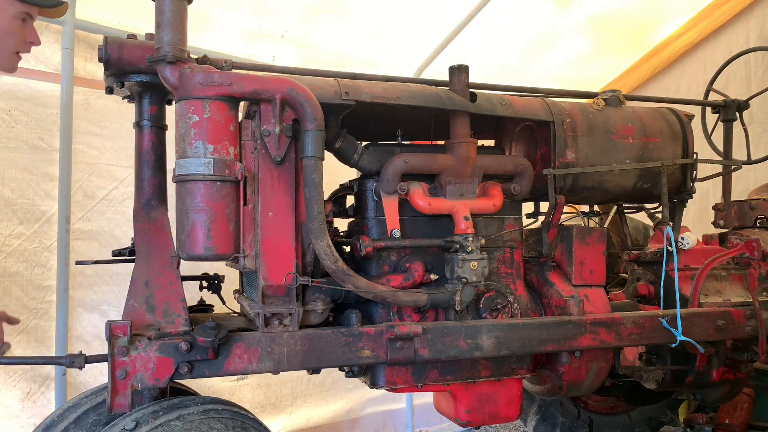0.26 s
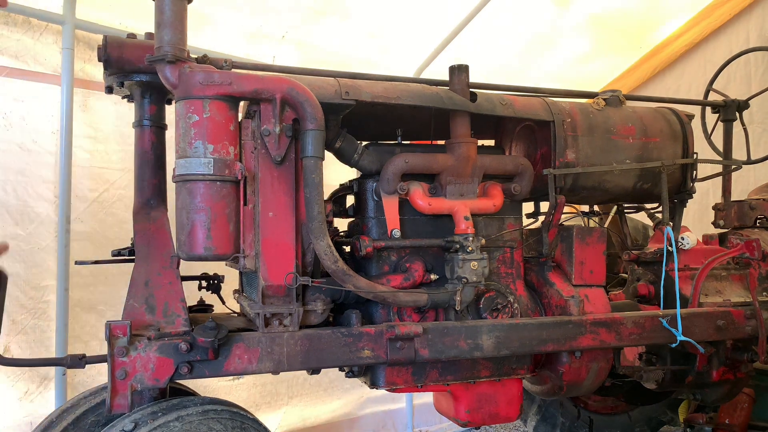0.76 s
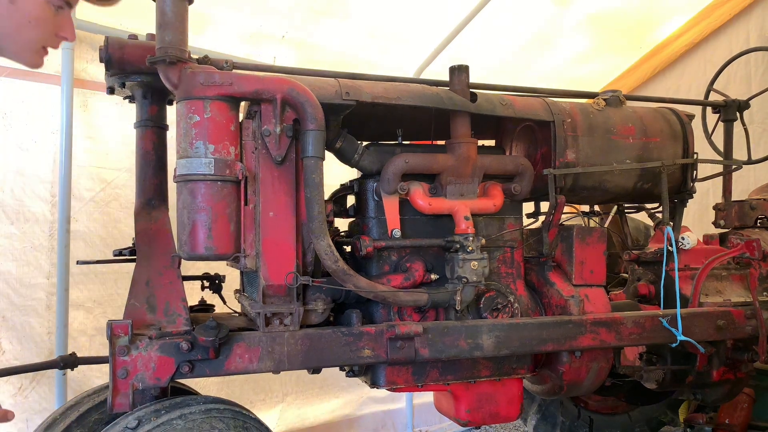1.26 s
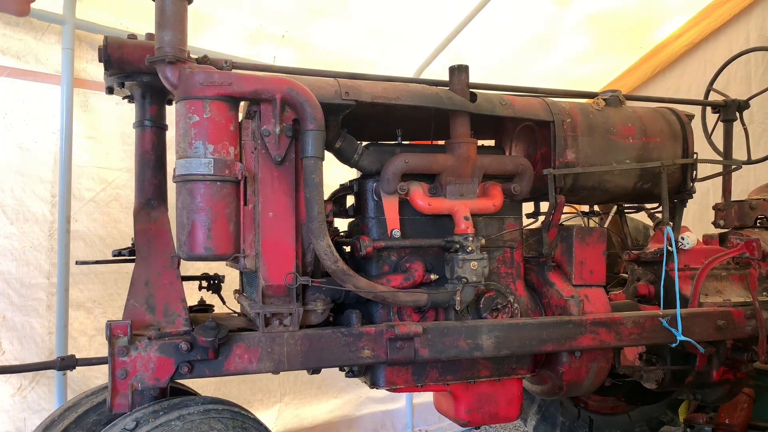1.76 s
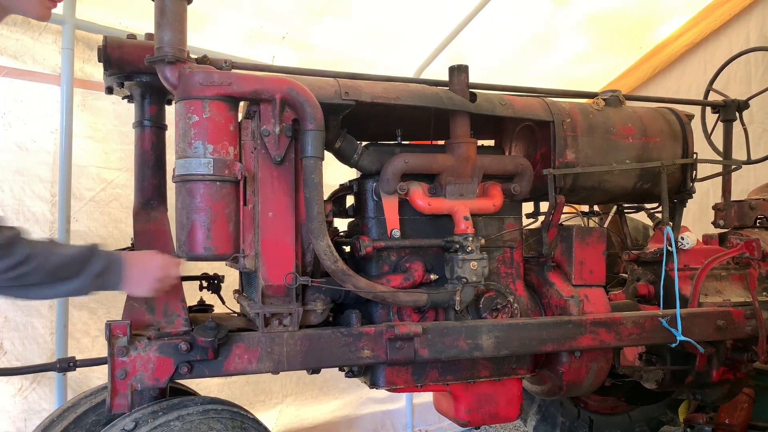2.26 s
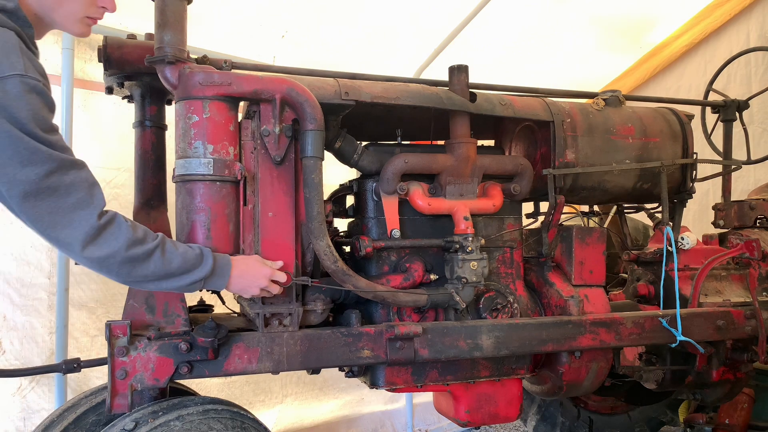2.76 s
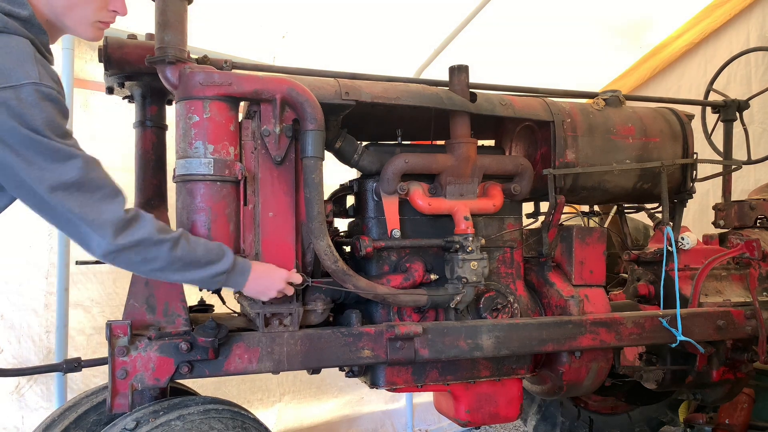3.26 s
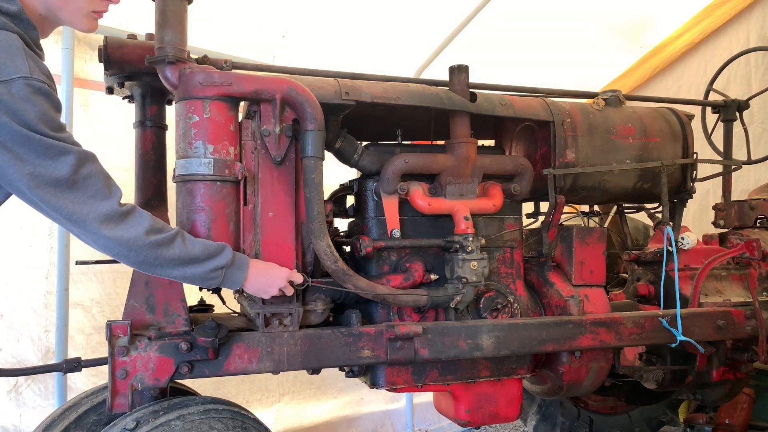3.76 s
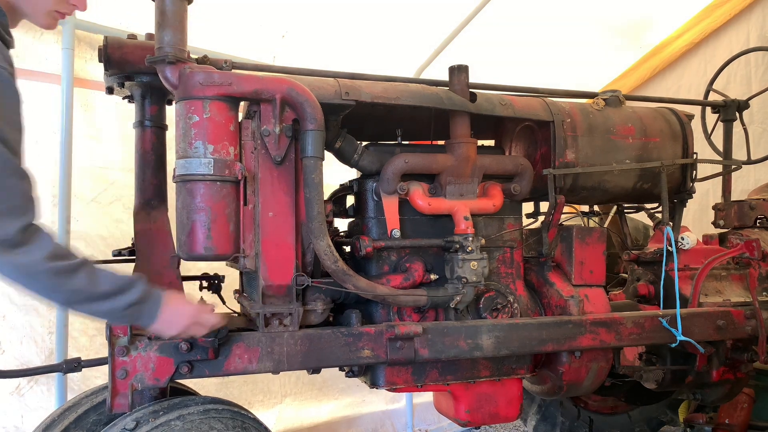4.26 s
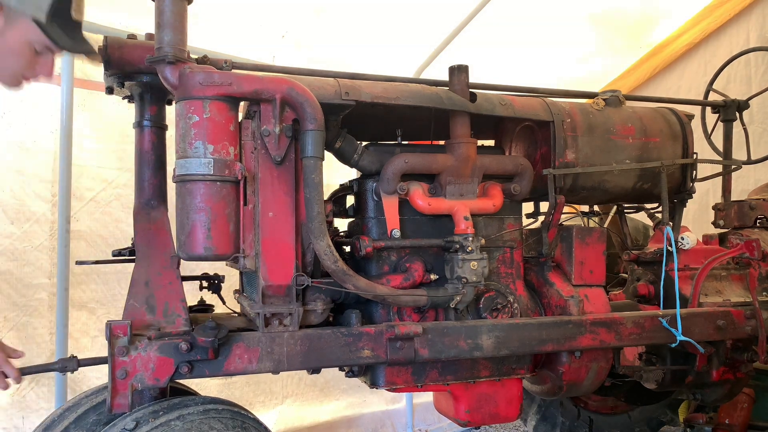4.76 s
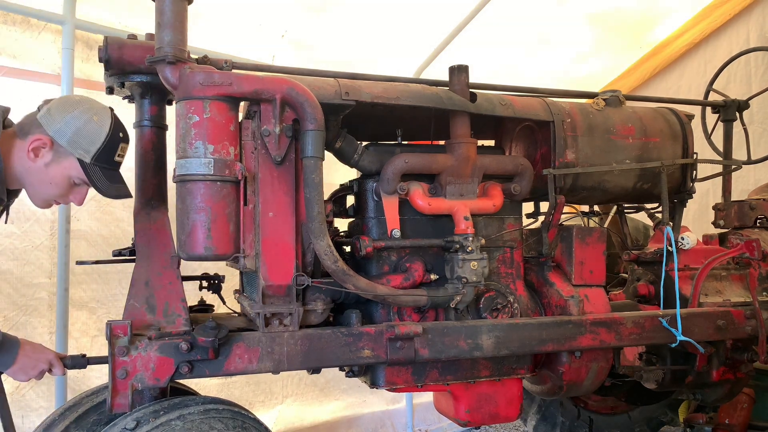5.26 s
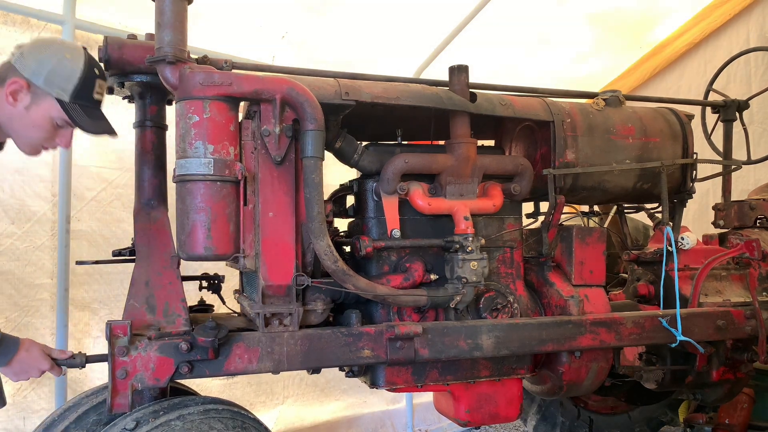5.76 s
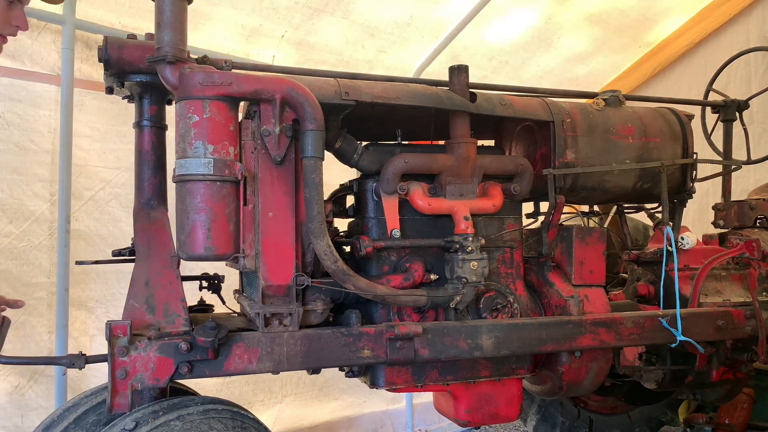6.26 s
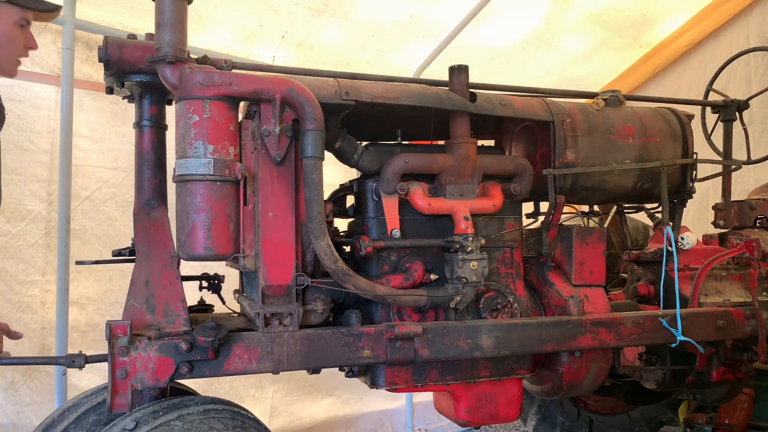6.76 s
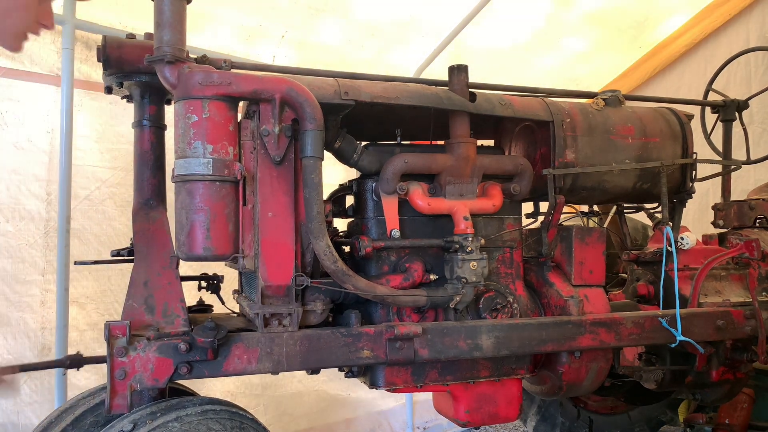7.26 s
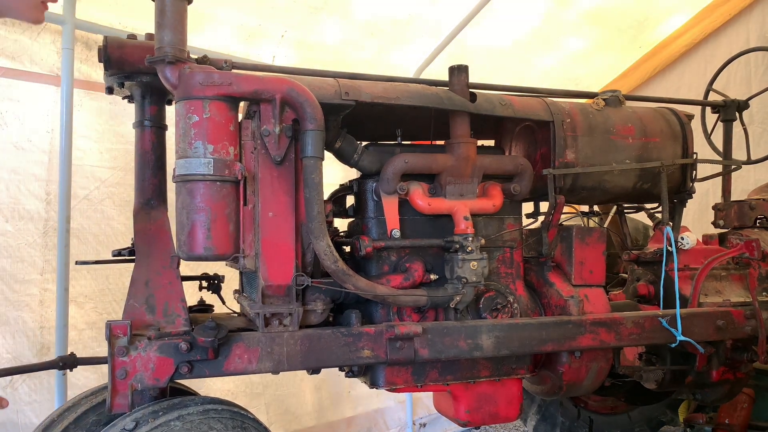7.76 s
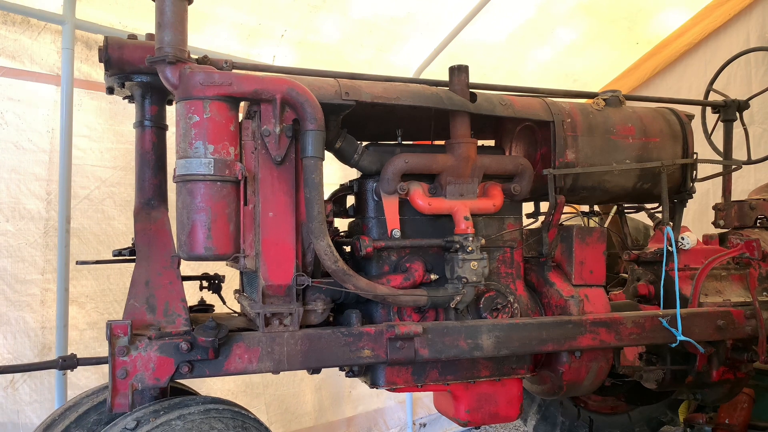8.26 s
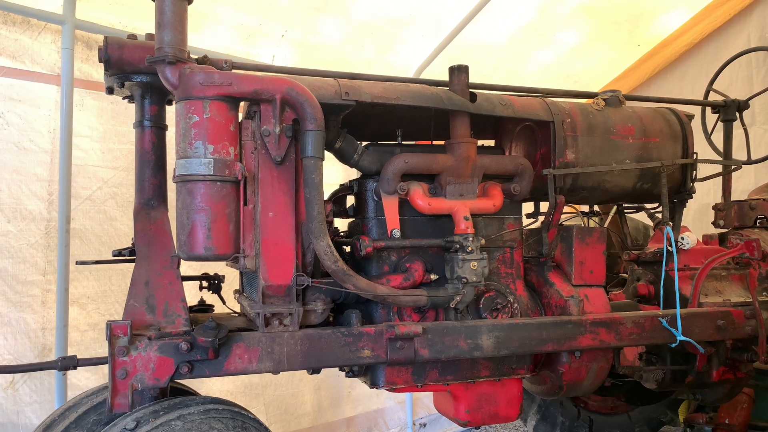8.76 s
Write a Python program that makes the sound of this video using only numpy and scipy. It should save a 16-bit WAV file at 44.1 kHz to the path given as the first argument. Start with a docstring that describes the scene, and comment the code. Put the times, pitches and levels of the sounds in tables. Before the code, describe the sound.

An old four-cylinder engine is hand-cranked in a tent, pops sharply, coasts down chuffing to silence, then after clanks sputters again.

```python
"""In a tent, an old four-cylinder tractor is hand-cranked, heard in two microphone ports.
Scuffs, gear rumble and clanks lead to magneto snaps and a run of sharp pops: filtered noise bursts and ringing modes.
The engine coasts to rest, its pipe booming (gliding tones) at every stroke; air hisses while the choke rod is held.
Loose linkage taps and squeaks, then the crank is knocked back into its dog and a second run of pops follows."""
import sys
import numpy as np
from scipy import signal
from scipy.fft import rfft, irfft, next_fast_len
from scipy.io import wavfile
from scipy.ndimage import map_coordinates

SR = 44100
rng = np.random.default_rng(int(sys.argv[2]) if len(sys.argv) > 2 else 0)


def persist_wave(psi):
    """Save psi, clipped to +-1, as 16-bit WAV."""
    counts = np.round(np.clip(psi, -1, 1) * 32767).astype(np.int16)
    wavfile.write(sys.argv[1], SR, np.atleast_2d(counts).T)


N = 397645

# All levels are relative: each source applies its own mix gains.
# firings: (time [s], treble [dB], body [dB], thud [dB], pipe boom [dB], boom pitch [Hz],
#           next cylinder's puff [dB], iron ring [dB], yelp pitch [Hz])
POPS = [(1.0957, -6, -23.5, -28.5, -61, 67, -59.5, -26.5, 1035),
        (1.2344, -6.5, -22, -27, -39, 74.8, -19.5, -24, 1123),
        (1.5188, -5, -23, -33, -36, 77.1, -45.5, -26.5, 1048),
        (1.6046, -8, -24.5, -28, -40, 66, -38.5, -25, 1000),
        (1.6717, -8, -23, -26.5, -39.5, 65.4, -41.5, -25.5, 1079),
        (7.314, -3, -22.5, -35, -33, 72.6, -15.5, -15, 1106),
        (7.814, -5.5, -23.5, -33.5, -36.5, 76.1, -21, -18.5, 1095),
        (7.9406, -6, -22.5, -39, -36, 75.5, -19, -23, 1000),
        (8.32, -4.5, -22, -33, -37, 74.8, -18.5, -21, 1144),
        (8.4439, -7, -23.5, -44, -34.5, 73.9, -18, -22, 1014),
        (8.6792, -5, -22, -17, -36, 79.5, -18, -15.5, 1191),
        (8.7945, -7, -23, -26.5, -39.5, 82.5, -21.5, -23, 1144),
        (8.8993, -6.5, -21, -30, -35.5, 79.3, -56, -17, 1090)]
# magneto and crank snapping over: (time [s], treble [dB], body [dB], ring [dB])
SNAPS = [(0.8465, -3.5, -17, -20.5), (0.9595, -17, -25, -41), (1.220, -19, -28, -38),
         (1.4548, -9.5, -24, -31), (7.192, -8.5, -24, -24), (7.5428, -8.5, -21, -27), (7.720, -7, -22, -26),
         (8.1226, -14, -31, -32), (8.252, -11, -26, -39), (8.6256, -16, -29, -36.5)]
# stray puffs from cylinders that do not fire: (time [s], treble [dB], body [dB])
PUFFS = [(0.9844, -30.5, -22), (1.3653, -28, -34), (7.2987, -22, -28), (7.6294, -25, -27.5),
         (7.802, -23, -29), (8.305, -21, -29), (8.5624, -21.5, -31)]
# choke rod, crank handle, loose parts: (time [s], treble [dB], body [dB], thud [dB], ring [dB], ring pitch [Hz])
CLANKS = [(0.6671, -33, -35, -30.5, -30, 665), (0.983, -28, -26.5, -25.5, -31, 715),
          (2.6597, -29.5, -33, -32.5, -29.5, 1164), (2.731, -33, -41, -51.5, -46, 4010),
          (2.9042, -43, -40, -53.5, -43, 2044), (3.146, -27.5, -37.5, -41.5, -39, 2010),
          (3.162, -52, -40.5, -43.5, -30, 570), (3.179, -26.5, -43, -51, -48, 3770),
          (3.974, -39, -46, -44, -51, 2670), (4.1644, -48.5, -52, -52, -49, 753),
          (4.268, -47, -48.5, -52.5, -55, 1150), (5.0793, -53, -45, -44, -44, 660),
          (5.0956, -36, -45, -42, -47, 1540), (5.154, -32, -33.5, -25.5, -29.5, 1502),
          (5.465, -35, -34.5, -40.5, -43, 1040), (5.593, -30.5, -41, -45, -35, 3680),
          (5.6827, -72.5, -48, -48, -52, 1570), (5.724, -28, -36, -39.5, -32, 390.4),
          (6.304, -50, -57, -50.5, -50, 432), (7.012, -40, -44, -44, -34, 718),
          (7.256, -41, -33.5, -31.5, -43, 1680), (7.783, -57, -38, -34.5, -32, 414),
          (8.176, -30, -35.5, -38, -41, 960)]
# light, dead taps of slack linkage: (time [s], level [dB])
TAPS = [(3.646, -57.5), (3.703, -49.5), (3.912, -55), (4.068, -55.5), (4.3394, -49.5), (4.4552, -54),
        (6.158, -62), (6.197, -62), (6.494, -61.5)]
# shoes and sleeves brushing: (middle [s], length [s], swish [dB], scrape [dB])
SCUFFS = [(0.055, 0.039, -58, -46), (0.248, 0.25, -55.5, -55.5), (0.61, 0.13, -50, -40.5),
          (3.962, 0.07, -83.5, -43), (4.517, 0.12, -52, -55), (4.735, 0.3, -48, -49),
          (5.584, 0.54, -86, -54.5), (6.26, 0.35, -66, -61), (6.927, 0.17, -62.5, -50.5)]
# unfired charges pushed out through the pipe: (time [s], length [s], level [dB], starting pitch [Hz])
GULPS = [(0.777, 0.086, -34.5, 63.7), (1.419, 0.11, -29, 73), (1.81, 0.042, -36.5, 63.07),
         (7.109, 0.1, -46, 57.7), (7.476, 0.164, -40, 74.7), (8.091, 0.14, -43.5, 71.2)]
# the choke rod squeaks once: (middle [s], length [s], pitch [Hz], width [Hz], level [dB])
SQUEAK = (3.745, .06, 6050, 350, -60)
# first try at the crank: (time [s], gear rumble [dB], air hiss [dB])
FIRST_TRY = [(0.0, -50.5, -65), (.27, -58, -70), (0.43, -57.5, -75), (0.6, -51.5, -68.5),
             (0.78, -42.5, -49), (1.05, -37.5, -50.5), (1.31, -49, -50.5), (1.53, -44.5, -42.5),
             (1.8, -42, -51.5)]
# second try at the crank: (time [s], gear rumble [dB], air hiss [dB])
SECOND_TRY = [(6.8, -70.5, -89), (7.41, -41, -35.5), (7.61, -40.5, -52), (7.86, -47, -46),
              (8.09, -45, -45.5), (8.45, -47.5, -41), (8.85, -46.5, -47), (9.02, -54, -49.5)]
# cylinders taking turns at the pipe in the coast: (starting pitch at full speed [Hz], fall over the stroke [dB])
CYLINDERS = [(65, -1.5), (68, 5)]

# resonances of block, manifold and tinwork: (frequency [Hz], width [Hz], height [dB])
IRON = [(333, 40, 6.5), (735, 30, 2.5), (1065, 74, 3.5), (2058, 30, 3), (2425, 30, 5.5), (3130, 36, 2.5),
        (3360, 39, 4.5), (4070, 36, 7), (6660, 21, 4.5), (7470, 36, 12)]
# resonances of the magneto's sprung coupling: (frequency [Hz], width [Hz], level [dB])
MAGNETO = [(655, 30, -0.5), (1304, 20, 1.5), (1826, 28, 7), (5700, 31, -1.5), (6360, 30, 3.5)]
# partials of a struck part: (multiple of its pitch, width [Hz], level [dB])
PARTIALS = [(1, 23.9, 1.5), (1.07, 24, -7.5)]

# spectra of the noises, all: (frequency [Hz], density [dB per Hz])
SIZZLE = [(2500, -21), (4400, -9), (6500, -4.5), (8000, -1), (11300, -1), (13000, -1), (15000, -4.5),
          (15800, -5.5)]
POP_BODY = [(60, -21), (130, 4.5), (280, -7), (520, -6), (800, -2.5), (1450, -2.5), (2000, 5.5),
            (3200, 2.5), (4500, -0.5), (7000, -21.5)]
POP_THUD = [(50, -17.5), (125, 5.5), (250, -11.5), (400, -12), (900, -34.0)]
SNAP_BODY = [(60, -15.5), (130, 5), (330, 2.5), (700, 0), (1300, -1), (2200, 0), (3000, -5.5), (4400, -5),
             (7000, -16.5)]
SNAP_TICK = [(2500, -23.5), (4500, -13.5), (5500, -2.5), (6700, 0.5), (8000, -3.5), (11300, 1.5),
             (13000, 0), (15800, -2)]
PUFF_BODY = [(250, -6), (700, 1), (1400, -2.5), (2300, -1), (3200, -7), (7000, -16.5)]
CLANK_TICK = [(1800, -24.5), (2900, -7.5), (4200, -2.5), (7000, -0.5), (11000, -1), (16000, -12.5)]
CLANK_BODY = [(400, -14.5), (800, -7.5), (1500, -6), (2400, -9.5), (3400, -7.5), (7000, -28)]
CLANK_THUD = [(60, -19), (170, -4.5), (290, -4), (400, 2.5), (700, -1.5), (1200, -10.5), (3000, -42)]
RUMBLE = [(40, -19.5), (90, -8.5), (145, 0.5), (220, 1), (280, -8.5), (400, -3.5), (520, -13.5), (900, -23),
          (3000, -55.5)]
RASP = [(300, -12.5), (650, 2.5), (1100, -3), (2200, -6), (3200, -12), (4500, -13), (8000, -18.5)]
SCRAPE = [(60, -8.5), (130, 2.5), (220, 2), (380, 1.5), (800, -3.5), (1700, -17), (3000, -15), (7000, -28)]
AIR = [(20, -25.5), (70, 5), (120, -3), (220, -5), (340, -12.5), (600, -23), (1400, -25.5), (3500, -32.5),
       (6500, -35), (10000, -52.5), (16000, -52)]
PIPE_MURMUR = [(25, -34.5), (55, -4.0), (72, -3.5), (90, -7.5), (130, -21.5), (500, -79)]
CHOKE_JET = [(2500, -25.5), (4200, -6.5), (7000, -3), (10500, -4.5), (16000, 4.0)]

# reverberation of the tent: (frequency [Hz], t60 [s])
TENT_T60_S = [(150, 0.51), (500, 0.24), (1400, 0.13), (3700, 0.2), (10000, 0.18), (16000, 0.019)]
# likeness of the two ports: (frequency [Hz], correlation)
LIKENESS = [(370, 1), (600, 0.55), (1200, 0.45), (2200, 0.3), (3200, 0), (5500, 0), (7000, 1), (15400, 1),
            (16000, 0.3)]
# left minus right port: (frequency [Hz], level [dB])
BALANCE_DB = [(200, 0), (600, -0.4), (2500, 1), (4200, -1.5), (5700, -4.5), (7000, 1), (8000, 0)]
# lag of the left port: (frequency [Hz], phase [turns])
PORT_LAG_TURNS = [(0, 0), (75, 0.0347), (5900, 0.03), (7900, 0.37), (8650, 0.5), (10200, 1.04),
                  (11500, 1.01), (13100, 1.48), (13900, 1.5), (15300, 2.5)]
EDGE_HZ = 15900

# friction slows the flywheel at a steady rate
COAST_START_S, COAST_STROKES_PER_S, FRICTION_STROKES_PER_S2 = 1.871, 14.14, 6.62
# sounds of the coasting engine: (level at full speed [dB], loss at a tenth of that speed [dB])
COAST_BOOM, COAST_SPIT, COAST_CHUFF = (-27, 34), (-28, 58), (-33.5, 31)
COAST_RUMBLE, COAST_HISS = (-36.5, 14.4), (-54, 26)
STILL_DB = -82.5  # gears and air with the engine at rest
RASP_FROM_AIR = 0.38  # sliding iron follows the gears, and by this share the gas pressure behind the hiss
BOOM_S, BOOM_FALL_DB = 0.2, 16.5  # boom after a firing: length, fade
COAST_FALL_DB_PER_S = 35  # slow strokes leak pressure: their booms fade more
COAST_PITCH_SAG = .2  # slower strokes start lower: by this share at rest
COAST_OPEN_SHARE, COAST_RING_S = .84, 0.022  # boom lasts this share of its stroke, plus this ring
COAST_LAG_S = .01  # boom starts this late at full speed
PUFF_LEAD_S = 0.005  # the valve puffs just before the stroke
NEXT_CYLINDER_S = 0.072  # the next cylinder puffs this long after a firing
NEXT_BODY_DB, NEXT_BODY_SHARE = -24, 0.74  # its body at 0 dB treble, and the share of the treble it follows
CHOKE_ON_S, CHOKE_OFF_S, CHOKE_RELEASE_S = 2.665, 3.19, 0.034
CHOKE_SAG_DB_PER_S = 9.5
CHOKE_MUTE_DB = -11  # the closed choke starves the puffs


def gain_of(db):
    """Amplitude factor of a level in dB."""
    return 10 ** (np.asarray(db) / 20)


def evened(x):
    """Scales to rms 1."""
    return x / np.sqrt(np.mean(x ** 2) + 1e-20)


def read(points, hz):
    """Reads a table on a log-frequency axis."""
    f, value = np.transpose(points)
    return np.interp(np.log(hz + 1), np.log(f + 1), value)


def curve(rows, axis=1):
    """One dB column of a table as a gain for every sample."""
    rows = np.array(rows)
    return gain_of(np.interp(np.arange(N) / SR, rows[:, 0], rows[:, axis]))


def add(mix, s, sound):
    """Lays a sound into the mix at time s."""
    part = mix[max(round(s * SR), 0):][:len(sound)]
    part += sound[:len(part)]


def colour(x, spectrum, ring=1., size=8192):
    """Causal unit-energy filter: a broad spectrum plus the iron's resonances, their dB scaled by ring."""
    hz = abs(np.fft.fftfreq(size, 1 / SR))
    iron_db = sum(h / (1 + (2 * (hz - f) / w) ** 2) for f, w, h in IRON)
    log_gain = np.log(gain_of(read(spectrum, hz) + ring * iron_db))
    minimum_phase = np.exp(np.conj(signal.hilbert(log_gain)))
    taps = np.fft.ifft(minimum_phase).real[:size // 2]
    return signal.oaconvolve(x, taps / np.linalg.norm(taps))[:N]


def turbulence(flutter_db, flutter_hz):
    """Noise whose strength flutters at random."""
    knots = np.arange(0, N, SR / flutter_hz)
    noise = rng.standard_normal(N)
    flutter = np.interp(np.arange(N), knots, rng.standard_normal(N)[:len(knots)])
    return evened(noise * gain_of(flutter_db * flutter))


def bursts(rows, axis, rise, decay, hold=0., delay=0., lead_db=-26, lead=0.016, crackle_db=2.5):
    """Crackling noise burst per row: faint leak ahead, quick swell, short hold, exponential fall; times in s."""
    level, t = np.zeros(N), np.arange(-SR // 16, SR // 2) / SR
    main = np.exp(np.minimum(t / rise, 0) - np.maximum((t - hold) / decay, 0))
    leak = gain_of(lead_db) * np.exp(-abs(t) / lead)
    for row in rows:
        add(level, row[0] + delay + t[0], gain_of(row[axis]) * (main + leak))
    return level * turbulence(crackle_db, 900)


def grit(per_s):
    """Tiny separate impacts, so many a second, at rms 1."""
    size = rng.standard_normal(N)
    struck = rng.random(N) < per_s / SR
    return evened(np.sign(size) * np.sqrt(abs(size)) * struck)


def chatter(rows, axis, decay, per_s, delay=0., hold=.003):
    """Metal meets metal: firm first contact, then a dying spray of tiny impacts."""
    level, t = np.zeros(N), np.arange(SR // 4) / SR
    shape = np.exp(-np.maximum(t - hold, 0) / decay)
    for row in rows:
        add(level, row[0] + delay, gain_of(row[axis]) * shape)
    return level * grit(per_s)


def modes(table, spread_db=2.5, rise=.003):
    """One blow rings each mode (frequency [Hz], width [Hz], level [dB]) at a slightly random strength."""
    t = np.arange(SR // 4) / SR
    hz, width, db = np.transpose(table)[:, :, None]
    phase, luck = rng.uniform(-1, 1, (2, len(table), 1))
    strength = gain_of(db + spread_db * luck - db.max())
    ring = strength * np.exp(-np.pi * width * t) * np.sin(2 * np.pi * hz * t + np.pi * phase)
    return ring.sum(0) * (1 - np.exp(-t / rise))


def coasting():
    """Strokes of the flywheel under constant friction: (time [s], length [s], share of full speed)."""
    strokes = np.arange(COAST_STROKES_PER_S ** 2 / (2 * FRICTION_STROKES_PER_S2))
    rate = np.sqrt(COAST_STROKES_PER_S ** 2 - 2 * FRICTION_STROKES_PER_S2 * strokes)
    times = COAST_START_S + (COAST_STROKES_PER_S - rate) / FRICTION_STROKES_PER_S2
    return list(zip(times, np.diff(times), rate / COAST_STROKES_PER_S))


def at_speed(law, speed):
    """Level in dB of a sound that fades as the engine slows."""
    return law[0] + law[1] * np.log10(speed)


def motion(last_stroke_db=-17, count=3):
    """First try, coast, rest, second try: (time [s], gear rumble [dB], iron rasp [dB], air hiss [dB])."""
    # the first strokes are skipped, so the levels glide into the coast
    coast = [(s, at_speed(COAST_RUMBLE, speed), at_speed(COAST_HISS, speed)) for s, _, speed in coasting()[count:]]
    last_s, rumble_db, hiss_db = coast[-1]
    stop_s = COAST_START_S + COAST_STROKES_PER_S / FRICTION_STROKES_PER_S2
    rest = [((last_s + stop_s) / 2, rumble_db + last_stroke_db, hiss_db + last_stroke_db),
            (stop_s, STILL_DB, STILL_DB),
            (SECOND_TRY[0][0] - .2, STILL_DB, STILL_DB)]
    rows = list(FIRST_TRY) + coast + rest + list(SECOND_TRY)
    return [(s, rumble, rumble + RASP_FROM_AIR * (hiss - rumble), hiss) for s, rumble, hiss in rows]


def still_air():
    """Air noise, mostly low, wavering slowly."""
    return gain_of(-62.0) * colour(turbulence(0.7, 3.1), AIR, 0)


def turning():
    """Gears rumble, iron slides and air hisses at levels set by the crankshaft's motion."""
    rumble = gain_of(1) * curve(motion(), axis=1) * colour(turbulence(2.2, 60), RUMBLE, 1.0)
    rasp = gain_of(-1.0) * curve(motion(), axis=2) * colour(turbulence(4.2, 70), RASP, .3)
    hiss = gain_of(2.0) * curve(motion(), axis=3) * colour(turbulence(3.9, 50), SIZZLE, .4)
    return rumble + rasp + hiss


def slow_cranking(follow=.5):
    """The pipe murmurs in low noise, its level following half the rumble's dB."""
    level = gain_of(-24.5) * curve(motion(), axis=1) ** follow
    return level * colour(turbulence(2, 12), PIPE_MURMUR, 0)


def rattle(per_s=28, spread_db=5, decay=0.0091):
    """Rods and tinwork chatter at random: decaying noise knocks that follow the iron rasp's level."""
    strength = gain_of(spread_db * np.minimum(rng.exponential(1, N), 2))
    knocks = (rng.random(N) < per_s / SR) * strength
    level = signal.lfilter([1], [1, -np.exp(-1 / (decay * SR))], knocks)
    noise = colour(evened(level * rng.standard_normal(N)), CLANK_BODY, .6)
    return gain_of(-14.5) * curve(motion(), axis=2) * noise


def scuffs():
    """Soft swells of gritty friction: cloth swishes, soles scrape."""
    swish, scrape = np.zeros((2, N))
    for s, length, swish_db, scrape_db in SCUFFS:
        swell = np.hanning(int(length * SR))
        add(swish, s - length / 2, gain_of(swish_db) * swell)
        add(scrape, s - length / 2, gain_of(scrape_db) * swell)
    return colour(swish * turbulence(6, 200), SIZZLE, 0) + colour(scrape * turbulence(5.0, 160), SCRAPE, 0)


def clanks():
    """Loose iron knocks on iron: tick, clank, ring of the struck part, thud, and a lingering dull frame hum."""
    tick = colour(bursts(CLANKS, axis=1, rise=0.0018, decay=0.014, delay=0.0015), CLANK_TICK, 0.97)
    contact = chatter(CLANKS, axis=2, decay=0.022, per_s=1800, delay=0.0023, hold=.003)
    clank = colour(contact, CLANK_BODY, 0.55)
    ring = np.zeros(N)
    for s, *_, db, hz in CLANKS:
        partials = [(hz * k, width, level) for k, width, level in PARTIALS]
        add(ring, s + 0.0027, gain_of(db) * modes(partials, spread_db=1.5, rise=.003))
    thud = colour(bursts(CLANKS, axis=3, rise=0.00097, decay=0.0093, delay=0.0043), CLANK_THUD, 0.52)
    hum = colour(bursts(CLANKS, axis=3, rise=.002, decay=0.13), CLANK_THUD, 1.0)
    return (gain_of(-4.5) * tick + gain_of(-3.0) * clank + gain_of(2.0) * ring
            + gain_of(1.5) * thud + gain_of(-21.0) * hum)


def exhaust_strokes():
    """Firings, gulps, coasting strokes: (time [s], length [s], level [dB], starting pitch [Hz], fall [dB])."""
    strokes = [(s, BOOM_S, db, hz, BOOM_FALL_DB) for s, _, _, _, db, hz, *_ in POPS]
    strokes += [(*row, 0) for row in GULPS]
    for k, (s, length, speed) in enumerate(coasting()):
        hz, fall_db = CYLINDERS[k % 2]
        strokes.append((s + COAST_LAG_S * speed ** 2,
                        COAST_OPEN_SHARE * length + COAST_RING_S,
                        at_speed(COAST_BOOM, speed),
                        hz * (1 - COAST_PITCH_SAG * (1 - speed)),
                        fall_db + COAST_FALL_DB_PER_S * length))
    return strokes


def pipe(climb=0.29, swell=.018, release=.009, overtone_db=-21):
    """Each exhaust stroke blows the pipe's lowest note, which climbs as the piston shrinks the cylinder."""
    boom = np.zeros(N)
    for s, length, db, hz, fall_db in exhaust_strokes():
        t = np.arange(0, length + release, 1 / SR)
        travel = t / length
        angle = 2 * np.pi * np.cumsum(hz * (1 + climb * travel ** 1.88)) / SR
        ramp = np.minimum(t / swell, (t[-1] - t) / (2 * release))
        gate = np.sin(np.pi / 2 * np.clip(ramp, 0, 1)) ** 2
        tone = np.sin(angle) + gain_of(overtone_db) * np.sin(2 * angle)
        add(boom, s, gain_of(db) * evened(tone * gate * gain_of(-fall_db * travel)))
    return gain_of(0.4) * boom


def snaps(rebound_s=0.015):
    """Sprung steel lets go, chatters, rings and strikes once more as it rebounds."""
    tick = bursts(SNAPS, axis=1, rise=0.0011, hold=0.0017, decay=0.022, delay=0.0011,
                  lead_db=-23, lead=0.014, crackle_db=0.5)
    rebound = bursts(SNAPS, axis=1, rise=0.001, decay=0.02, delay=rebound_s, crackle_db=3.5)
    strikes = colour(gain_of(-7) * tick + gain_of(-12) * rebound, SNAP_TICK, 0.52)
    contact = chatter(SNAPS, axis=2, decay=.012, per_s=2200, delay=0.00068, hold=.009)
    body = colour(contact, SNAP_BODY, .7)
    ring = np.zeros(N)
    for s, *_, db in SNAPS:
        add(ring, s, gain_of(db) * modes(MAGNETO, spread_db=4, rise=0.0013))
    return strikes + gain_of(0.2) * body + gain_of(-1.5) * ring


def coasting_puffs():
    """A valve opens ahead of each coasting stroke: (time [s], treble [dB], body [dB])."""
    rows = []
    for s, _, speed in coasting():
        mute_db = CHOKE_MUTE_DB * (CHOKE_ON_S < s < CHOKE_OFF_S)
        spit_db = at_speed(COAST_SPIT, speed) + mute_db
        chuff_db = at_speed(COAST_CHUFF, speed) + mute_db
        rows.append((s - PUFF_LEAD_S, spit_db, chuff_db))
    return rows


def unburnt_charges():
    """Stray puffs, one after each firing, one per coasting stroke: (time [s], treble [dB], body [dB])."""
    after = [(s + NEXT_CYLINDER_S, db, NEXT_BODY_DB + NEXT_BODY_SHARE * db) for s, *_, db, _, _ in POPS]
    return list(PUFFS) + after + coasting_puffs()


def puffs():
    """Unburnt charges leave in soft, rounded puffs, chuffing in the manifold."""
    charges = unburnt_charges()
    spit = colour(bursts(charges, axis=1, rise=0.006, hold=0.012, decay=0.011, delay=-0.001), SIZZLE, 0.4)
    chuff = colour(bursts(charges, axis=2, rise=0.006, hold=0.011, decay=0.0074, delay=0.003), PUFF_BODY, 0.4)
    return gain_of(-6.0) * spit + gain_of(-4.5) * chuff


def yelps(width=0.55, crest_s=.021, steep=8, climb=.75, climb_s=0.01415, delay=-.0185):
    """The opening gap yelps: a breathy resonance swells and dies; width and climb are shares of its pitch."""
    out, t = np.zeros(N), np.arange(SR // 5) / SR
    swell = (t / crest_s * np.exp(1 - t / crest_s)) ** steep
    for s, _, db, *_, pitch in POPS:
        pole = np.exp(-np.pi * width * pitch / SR)
        complex_noise = rng.standard_normal((len(t), 2)) @ [1, 1j]
        wobble = signal.lfilter([1], np.poly([pole, pole]), complex_noise)
        turns = np.cumsum(pitch * (1 - climb * np.exp(-t / climb_s))) / SR
        ring = swell * (wobble * np.exp(2j * np.pi * turns)).real
        add(out, s + delay, gain_of(db) * ring * np.linalg.norm(swell) / np.linalg.norm(ring))
    return out


def iron_ring(contrast=1.2, delay=.004):
    """Every firing shakes the same upper modes of the iron."""
    out = np.zeros(N)
    table = [(hz, width, contrast * height) for hz, width, height in IRON[1:]]
    for s, *_, db, _ in POPS:
        add(out, s + delay, gain_of(db) * modes(table, spread_db=5.5, rise=.004))
    return out


def pops():
    """Burning gas forces its way out: rising yelp, then bark and thud under a sharp spit; the iron rings."""
    spit = bursts(POPS, axis=1, rise=0.0021, hold=0.0048, decay=0.0095, delay=0.001,
                  lead_db=-19, lead=.013, crackle_db=2.5)
    bark = bursts(POPS, axis=2, rise=0.0048, hold=0.0073, decay=0.012, delay=0.004,
                  lead_db=-17.5, lead=0.019, crackle_db=2.0)
    thud = bursts(POPS, axis=3, rise=0.0025, decay=0.022, delay=0.0019)
    gas = gain_of(-5) * colour(spit, SIZZLE, 0.84) + gain_of(2.5) * colour(bark, POP_BODY, 1.5)
    return (gas + gain_of(-3.5) * yelps() + gain_of(-8.5) * iron_ring()
            + gain_of(-5) * colour(thud, POP_THUD, .5))


def valves():
    """The valve gear ticks crisply at every coasting stroke."""
    rows = coasting_puffs()
    tick = colour(chatter(rows, axis=1, decay=.007, per_s=5000, delay=.005, hold=.003), SIZZLE, .5)
    tap = colour(chatter(rows, axis=2, decay=.009, per_s=1500, delay=.005, hold=.004), PUFF_BODY, 1.2)
    return gain_of(-3) * tick + gain_of(-9.5) * tap


def choke(attack=.01):
    """Air is drawn past the closed choke while the rod is held, weakening as the engine slows."""
    t = np.arange(N) / SR
    opening = np.exp(-np.maximum(t - CHOKE_OFF_S, 0) / CHOKE_RELEASE_S)
    held = np.clip((t - CHOKE_ON_S) / attack, 0, 1) * opening
    suction = held * gain_of(-CHOKE_SAG_DB_PER_S * np.maximum(t - CHOKE_ON_S, 0))
    jet = colour(turbulence(.8, 80), CHOKE_JET, 0.72)
    hiss = colour(turbulence(1.5, 50), SIZZLE, 1.0)
    throat = colour(turbulence(1.9, 50), PUFF_BODY, .8)
    return suction * (gain_of(-36.0) * jet + gain_of(-44.0) * hiss + gain_of(-53.0) * throat)


def taps():
    """Slack joints tap without a tone: short sprays of impacts."""
    return colour(chatter(TAPS, axis=1, decay=0.021, per_s=2000), RASP)


def squeak():
    """Dry metal slips and sings in one narrow resonance."""
    s, length, hz, width, db = SQUEAK
    out, swell = np.zeros(N), np.hanning(int(length * SR))
    pole = np.exp((2j * hz - width) * np.pi / SR)
    ring = signal.lfilter([1], np.poly([pole, pole]), rng.standard_normal(len(swell))).real
    add(out, s - length / 2, gain_of(db) * swell * evened(ring))
    return out


def reflections(gap=.002, size=256):
    """Dense random echoes of the tent, each band dying at its own speed."""
    count = SR * 3 // 4
    taps = rng.standard_normal(count) * (rng.random(count) < .12) * (np.arange(count) > gap * SR)
    hz, t, z = signal.stft(taps, SR, nperseg=size)
    t60 = read(TENT_T60_S, hz)[:, None]
    tail = signal.istft(z * gain_of(-60 * t / t60) / np.sqrt(t60), SR, nperseg=size)[1]
    return tail / np.linalg.norm(tail)


def tent(x, wet_db=-5.0, count=7):
    """Direct sound plus echoes: several random tails crossfade ten times a second, avoiding a fixed comb."""
    turn = np.arange(N) / SR * 10
    wet = np.zeros(N)
    for k in range(count):
        distance = np.minimum(abs((turn - k) % count - 1), 1)
        wet += signal.oaconvolve(x * np.cos(np.pi / 2 * distance), reflections())[:N]
    return (x + gain_of(wet_db) * wet) / np.hypot(1, gain_of(wet_db))


def sound_field():
    """The noisy sources in the tent, plus the pipe's murmur and still air without echoes."""
    engine = turning() + rattle() + snaps() + puffs() + pops() + valves() + choke()
    handling = scuffs() + clanks() + taps() + squeak()
    return tent(engine + handling) + slow_cranking() + still_air()


def shifting_colour(x, patchy_db=3.0, patch_hz=330, patch_s=.06, size=512):
    """Overtones come and go in random patches of time and frequency."""
    hz, t, z = signal.stft(x, SR, nperseg=size)
    where = np.meshgrid(hz / patch_hz, t / patch_s, indexing="ij")
    patches = map_coordinates(rng.standard_normal((size, size)), where, order=2, mode="wrap")
    depth = hz ** 2 / (hz ** 2 + (2 * patch_hz) ** 2)  # the low rumble stays even
    gain = gain_of(patchy_db * patches * depth[:, None])
    gain /= np.sqrt(np.mean(gain ** 2, axis=1, keepdims=True))
    return signal.istft(z * gain, SR, nperseg=size)[1][:, :N]


def ports(a, b):
    """Two ports mix two sound fields by likeness per frequency, with a lag and a balance between them."""
    size = next_fast_len(N + SR, True)
    hz = np.fft.rfftfreq(size, 1 / SR)
    a, b = rfft(a, size), rfft(b, size)
    same = np.clip(read(LIKENESS, hz), -1, 1)
    common, apart = np.sqrt((1 + same) / 2) * a, np.sqrt((1 - same) / 2) * b
    lag = np.exp(-2j * np.pi * np.interp(hz, *np.transpose(PORT_LAG_TURNS)))
    lean = gain_of(read(BALANCE_DB, hz) / 2)
    left, right = (common + apart) * lean * lag, (common - apart) / lean
    return irfft(np.array([left, right]), size)[:, :N]


def scene():
    """Two draws of the sound field feed the ports; the pipe is common to both."""
    a, b = shifting_colour(np.array([sound_field(), sound_field()]))
    return ports(a + pipe(), b)


def record(dry):
    """The loudest peaks are squashed softly; then the recorder's band limit."""
    squashed = dry / (1 + (abs(dry) / .9) ** 6) ** (1 / 6)
    low_pass = signal.firwin(511, EDGE_HZ, window=("kaiser", 8), fs=SR)
    return signal.oaconvolve(squashed, low_pass[None], "same")


dry = scene()
out = record(dry)
persist_wave(out)
```